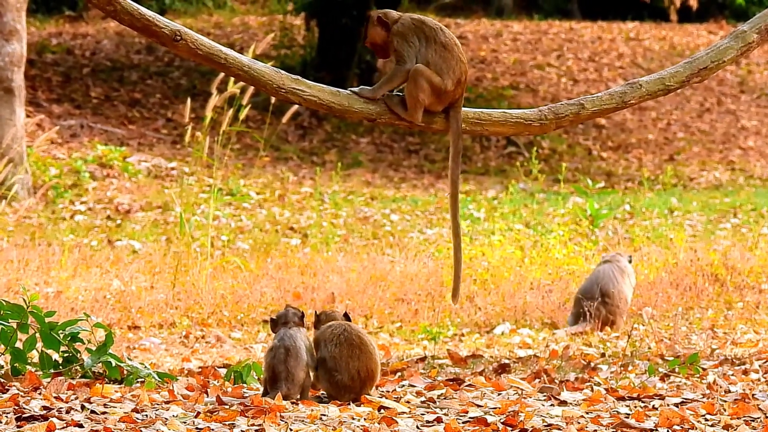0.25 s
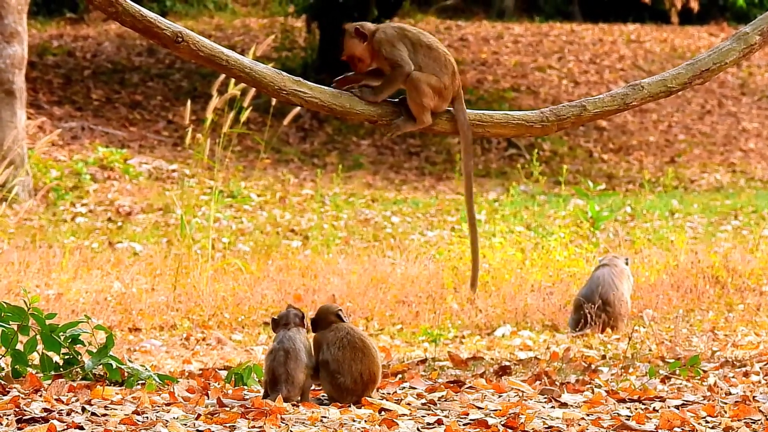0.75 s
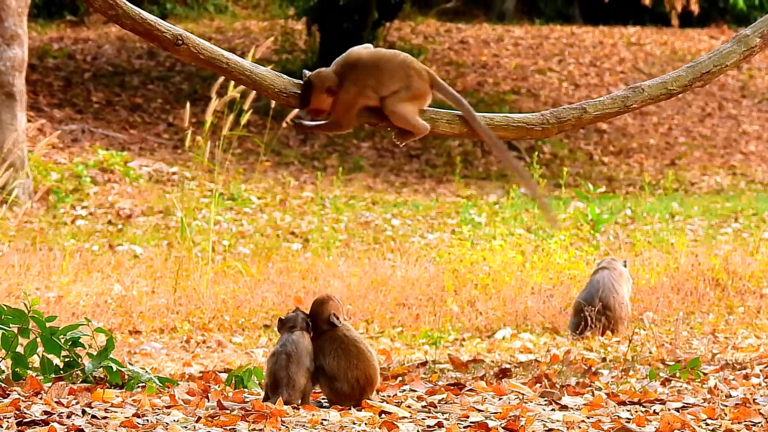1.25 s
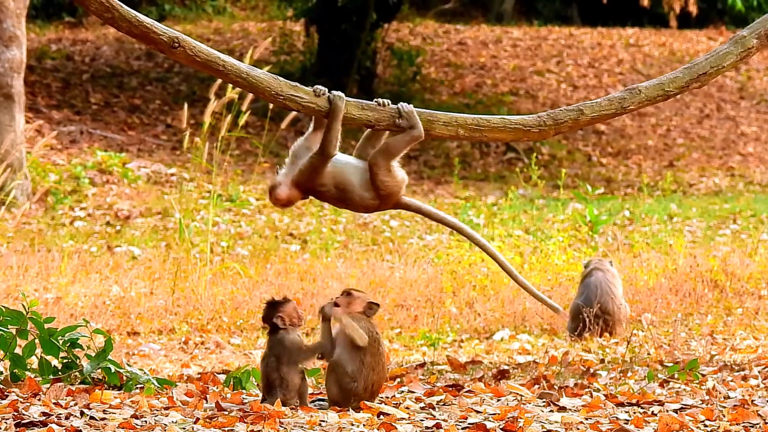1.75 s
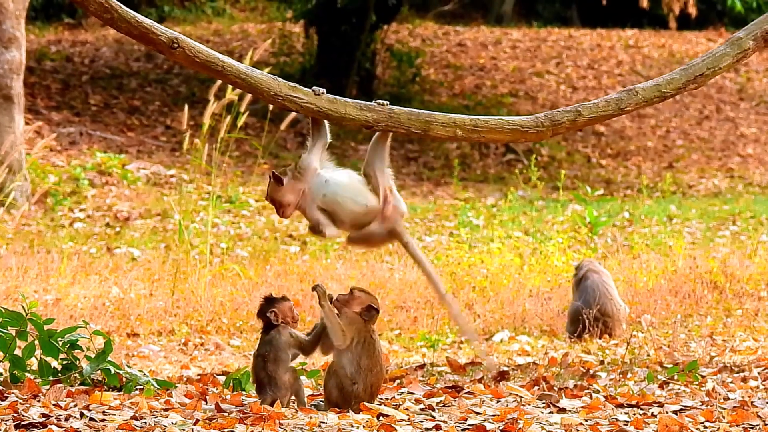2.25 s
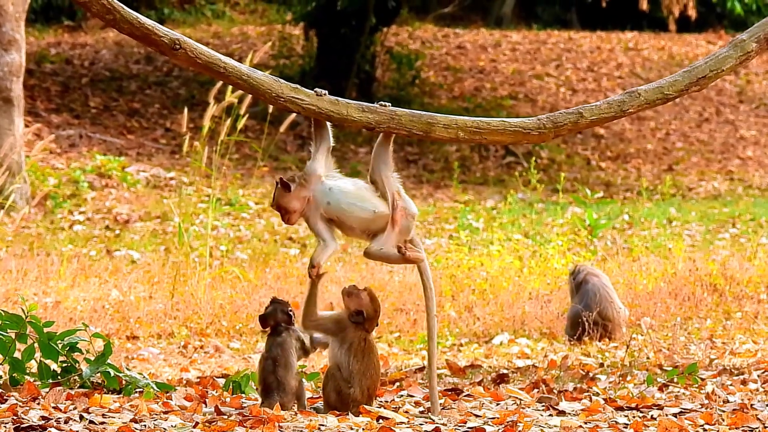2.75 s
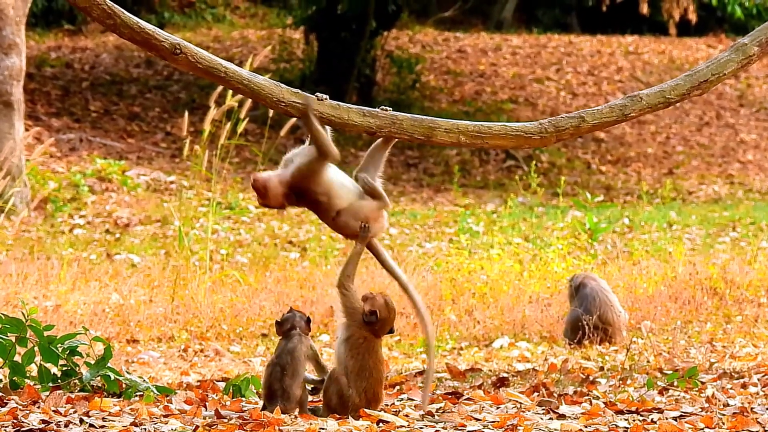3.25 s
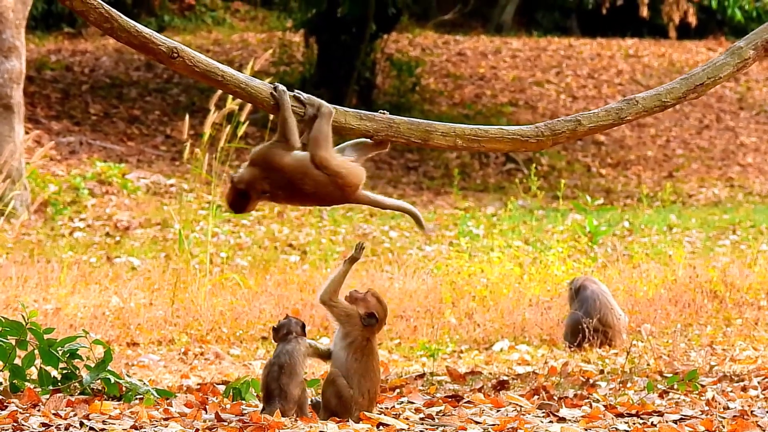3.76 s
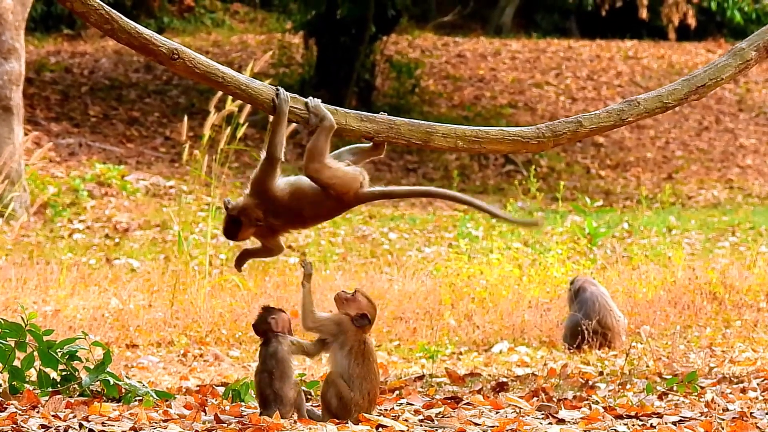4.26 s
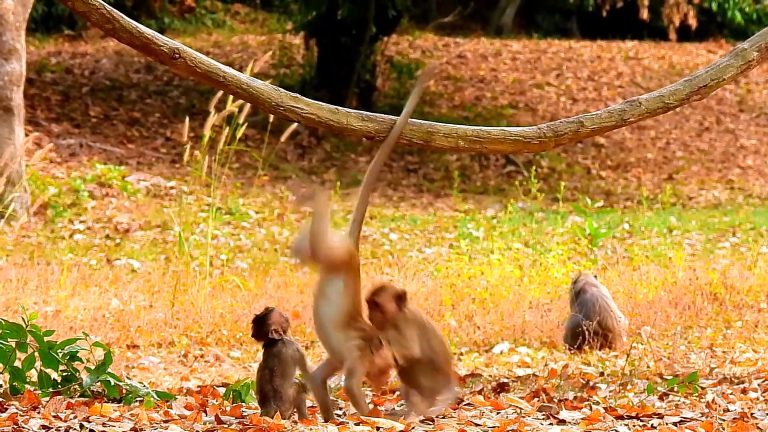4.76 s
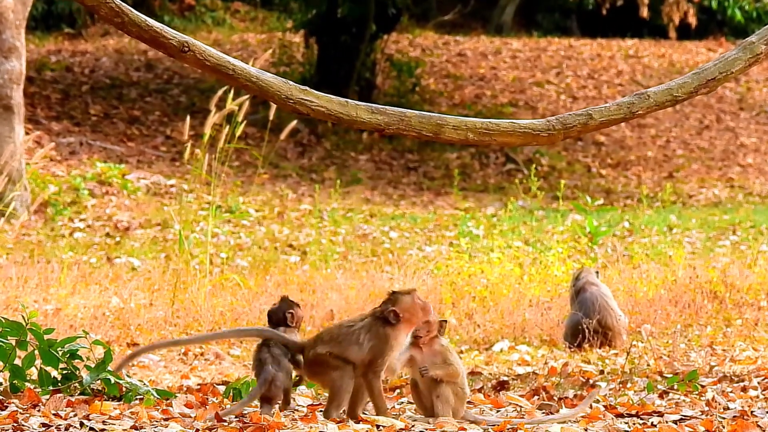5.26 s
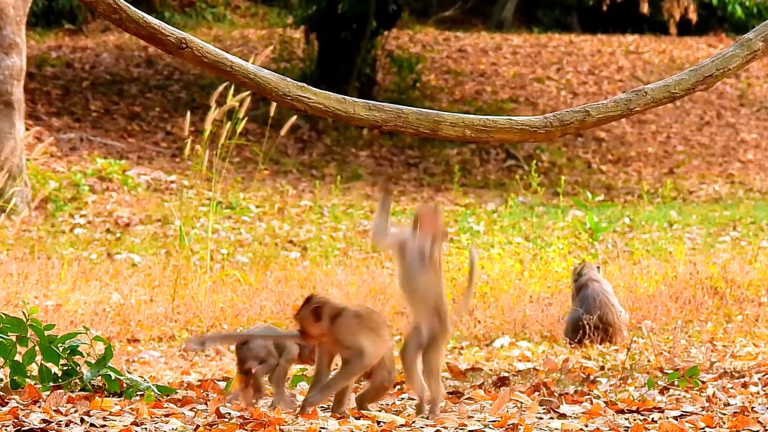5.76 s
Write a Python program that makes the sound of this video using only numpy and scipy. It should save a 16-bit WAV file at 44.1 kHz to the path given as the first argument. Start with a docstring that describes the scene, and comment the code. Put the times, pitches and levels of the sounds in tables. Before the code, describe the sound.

Young monkeys coo softly and give short falling squeals in a forest clearing, then tumble with knocks and leaf scuffling over a low steady rumble.

```python
"""A coo already under way opens over a low rumble and an even hiss; squeals and peeps follow.
Young monkeys wrestle on dry leaves in a forest clearing, scuffling and thudding when one drops from a vine.
Squeals are falling near-sinusoids and coos arched harmonic stacks, convolved with scatter from the trees.
Crunches and bright hiss bursts are filtered snaps and noise, thuds and knocks decaying tones,
the background shaped noise."""
import sys
import numpy as np
from scipy import signal
from scipy.fft import rfft, irfft
from scipy.io import wavfile

SR = 44100
rng = np.random.default_rng(int(sys.argv[2]) if len(sys.argv) > 2 else 0)


def dump(signal):
    """Clip the signal to [-1, 1] and save it as 16-bit WAV at the path in sys.argv[1]."""
    limited = np.clip(np.atleast_2d(signal).T, -1, 1)
    pcm = np.round(limited * 32767).astype(np.int16)
    wavfile.write(sys.argv[1], SR, pcm)


N = 264579
TIME = np.arange(N) / SR

# spectrum of the bright hiss bursts, also of a knock's tick: (frequency [Hz], relative spectral level [dB])
BRIGHT_SPECTRUM = [(300, -1), (1000, -2.5), (2500, 0.5), (4300, -4.5), (6000, -1.5), (7000, -2.5),
                   (7800, -9)]


def amp(db):
    """Level definition: 20 dB is a tenfold amplitude."""
    return 10 ** (np.asarray(db) / 20)


def unit(x):
    """Normalisation: scales a signal to rms 1."""
    return x / np.sqrt(np.mean(x ** 2) + 1e-20)


def read(points, hz):
    """Log-frequency interpolation of a tabulated spectrum."""
    frequency, value = np.transpose(points)
    return np.interp(np.log(hz + 1), np.log(frequency), value)  # + 1 keeps the log finite at 0 Hz


def add(mix, start, sound):
    """Superposition: adds a sound in place at a start time [s], which may lie before zero."""
    at = round(start * SR)
    sound = sound[max(-at, 0):]
    part = mix[max(at, 0):][:len(sound)]
    part += sound[:len(part)]


def colour(x, points):
    """Linear filtering: weights the spectrum of a signal, then scales it to rms 1."""
    hz = np.fft.rfftfreq(len(x), 1 / SR)
    return unit(irfft(rfft(x) * amp(read(points, hz)), len(x)))


def drift(size, rate_hz):
    """Low-pass noise: smooth random motion up to a rate, cut from 8 s of rms 1."""
    hz = np.fft.rfftfreq(SR * 8, 1 / SR)
    spectrum = rfft(rng.standard_normal(SR * 8)) / (1 + (hz / rate_hz) ** 4)
    return unit(irfft(spectrum))[:size]


def burst(peak_s, rise, decay):
    """Exponential growth to 1 at the peak time, then exponential decay."""
    return np.exp(-np.maximum((peak_s - TIME) / rise, (TIME - peak_s) / decay))


def bursts(rows):
    """Incoherent addition: the powers of overlapping bursts add."""
    power = sum((amp(db) * burst(peak_s, rise, decay)) ** 2 for peak_s, rise, decay, db in rows)
    return np.sqrt(power)


def glide(hz, db, jitter):
    """Phase is the integral of pitch: gives pitch, phase and gain of a slightly unsteady call."""
    hz = hz * (1 + jitter * drift(len(hz), 66))
    phase = 2 * np.pi * np.cumsum(hz) / SR
    return hz, phase, amp(db) * signal.windows.tukey(len(hz), .08)


def forest(x, echo_db, build=0.014, early=0.73, early_decay=0.014):
    """Multiple scattering from trunks and crowns: near trees first, then a tail damped by frequency."""
    # reverberation of the forest: (frequency [Hz], time to fall by 60 dB [s])
    echo_times = [(300, 0.53), (2100, 1.59), (3600, 1.69), (7000, 1.3)]
    taps = rng.standard_normal(2 * SR) * (rng.random(2 * SR) < 2500 / SR)  # about 2500 reflections a second
    hz, t, z = signal.stft(taps, SR, nperseg=256)
    z = z * amp(-60 * t / read(echo_times, hz)[:, None])
    z = z * (1 - np.exp(-t / build)) * (1 + early * np.exp(-t / early_decay))
    tail = signal.istft(z, SR, nperseg=256)[1]
    wet = signal.fftconvolve(x, tail)
    wet *= amp(echo_db) * np.linalg.norm(x) / np.linalg.norm(wet)  # echo energy relative to the direct sound
    return wet + np.pad(x, (0, len(wet) - len(x)))


def squeals(jitter=0.0052, flutter_db=2.5, fade_db=-11, octave_db=-41):
    """Nearly sinusoidal phonation: pitch relaxes exponentially to a lower value while the voice swells."""
    # falling squeals: (time [s], length [s], first pitch [Hz], last pitch [Hz], glide time [s],
    # level [dB], swell time [s], onset re level [dB], echo re direct sound [dB])
    squeal_table = [(.94, 0.19, 3184, 2035, 0.049, -39, 0.15, -6, 3.5),
                    (1.396, 0.19, 3108, 2068, 0.054, -49.5, 0.15, -9, 5),
                    (1.485, 0.31, 2943, 2037, 0.063, -49.5, 0.045, 4, 8.5),
                    (2.577, 0.22, 3276, 2030, 0.073, -53, 0.18, -4, 6),
                    (4.166, 0.3, 3400, 1988, 0.052, -50, 0.12, -18.5, -4.5),
                    (4.532, 0.23, 2924, 2019, 0.04, -30.5, 0.12, -19, -5.5),
                    (5.314, 0.23, 2902, 1993, .048, -51, 0.064, -11, 5),
                    (5.391, 0.18, 3168, 2060, .065, -52, 0.13, 0, 8),
                    (5.439, 0.23, 2730, 2070, .05, -39.5, 0.066, -29, 1.5),
                    (5.662, 0.25, 3064, 2118, .08, -57.5, 0.18, -4, 9.5)]
    out = np.zeros(N)
    for start, length, first_hz, last_hz, glide_s, db, swell, onset_db, echo_db in squeal_table:
        t = np.arange(0, length, 1 / SR)
        hz = last_hz + (first_hz - last_hz) * np.exp(-t / glide_s)
        hz = hz * (1 + jitter * drift(len(t), 70))
        phase = 2 * np.pi * np.cumsum(hz) / SR
        level_times = [0, swell / 2, swell, (swell + length) / 2, length]
        level = db + np.interp(t, level_times, [onset_db, -2.5, 0, -1.5, fade_db])
        gain = amp(level + flutter_db * drift(len(t), 24)) * signal.windows.tukey(len(t), .08)
        tone = unit(np.sin(phase) + amp(octave_db) * np.sin(2 * phase))
        add(out, start, forest(gain * tone, echo_db))
    return out


def coos(flutter_db=1.44):
    """Harmonic series on one pitch arch, loudest at its top, with breath hiss and uneven cycles."""
    # coos: (time [s], length [s], top pitch [Hz], scoop time [s], final sag [share of pitch], level [dB])
    coo_table = [(-.17, 0.23, 958.4, 0.026, 0.084, -56.5), (.43, .23, 944.7, .02, .17, -47),
                 (1.392, 0.21, 910, .034, 0.122, -49), (2.738, .212, 862.5, .012, 0.12, -50)]
    # voice of each coo: (echo re direct sound [dB], hiss re tone [dB], hoarseness [share of pitch],
    # then levels of harmonics 1 to 8 [dB])
    voice_table = [(2.5, -6.5, 0.0034, -8, -10, -5.5, 0, -15, -21, -19.5, -30),
                   (-1, -10, 0.0043, -17.5, -5, -8.5, 0.01, -19, -20, -14, -19.5),
                   (3.5, -4.5, 0.0136, -19, -7, -10.5, 0.011, -16, -12, -11, -21.5),
                   (0.5, -6, 0.0069, -25, -8.5, -5.5, 0, -24.5, -11, -12, -21)]
    # hiss in a coo: (frequency [Hz], relative spectral level [dB])
    hiss_spectrum = [(500, -8.5), (1500, -2.5), (3000, 7), (4300, -7.5), (6200, -1.5), (7800, -6)]
    scoop_share, sag_s, soft_db_per_octave = .14, .02, 28
    out = np.zeros(N)
    for coo, voice in zip(coo_table, voice_table):
        start, length, top_hz, scoop_s, sag, db = coo
        echo_db, hiss_db, hoarse, *harmonics_db = voice
        t = np.arange(0, length, 1 / SR)
        arch = (1 - scoop_share * np.exp(-t / scoop_s)) * (1 - sag * np.exp((t - length) / sag_s))
        level = db + soft_db_per_octave * np.log2(arch) + flutter_db * drift(len(t), 20)
        hz, phase, gain = glide(top_hz * arch, level, jitter=0.0033)
        # uneven cycles blur the upper harmonics
        phase = phase + 2 * np.pi * np.cumsum(hz * hoarse * drift(len(hz), 300)) / SR
        stack = sum(amp(h_db) * np.sin(k * phase) for k, h_db in enumerate(harmonics_db, 1))
        hiss = amp(hiss_db) * colour(rng.standard_normal(len(t)), hiss_spectrum)
        add(out, start, forest(gain * (unit(stack) + hiss), echo_db))
    return out


def squeak(flutter_db=4, echo_db=-6.0):
    """Frequency and amplitude modulation: one thin, shaky whistle that dips and rises."""
    # high squeak: (time [s], pitch [Hz], level [dB])
    squeak_table = [(4.61, 6620, -74.5), (4.69, 6250, -65.5), (4.708, 6220, -58), (4.75, 5910, -61.5),
                    (4.797, 5060, -64), (4.815, 5430, -60), (4.855, 5780, -61.5), (4.893, 7070, -58),
                    (4.918, 7300, -58)]
    out = np.zeros(N)
    times, hz, db = np.transpose(squeak_table)
    t = np.arange(times[0], times[-1], 1 / SR)
    level = np.interp(t, times, db) + flutter_db * drift(len(t), 70)
    _, phase, gain = glide(np.interp(t, times, hz), level, jitter=.011)
    add(out, times[0], forest(gain * unit(np.sin(phase)), echo_db))
    return out


def peeps(echo_db=-1.0):
    """Linear frequency sweeps: sinusoidal little calls with soft ends."""
    # faint peeps and chirps: (time [s], length [s], first pitch [Hz], last pitch [Hz], level [dB])
    peep_table = [(0.383, 0.039, 5980, 5380, -61), (0.392, .055, 2010, 2550, -56.5),
                  (2.125, 0.023, 7530, 4980, -65.5), (2.712, 0.018, 6900, 4600, -55.5),
                  (3.409, 0.077, 2145, 2080, -62.5), (3.669, .018, 2373, 2144, -49),
                  (3.84, .4, 1513, 1462, -64.5)]
    out = np.zeros(N)
    for start, length, first_hz, last_hz, db in peep_table:
        size = round(length * SR)
        _, phase, gain = glide(np.linspace(first_hz, last_hz, size), db, jitter=0.0059)
        gain = gain * signal.windows.tukey(size, .5)
        add(out, start, forest(gain * unit(np.sin(phase)), echo_db))
    return out


def thuds():
    """Heavily damped oscillation: dull blows whose pitch wanders over a band."""
    # soft thuds: (peak time [s], pitch [Hz], width [Hz], rise [s], decay [s], level [dB])
    thud_table = [(4.7, 42, 25.3, 0.039, 0.045, -52), (4.81, 45, 35.8, 0.053, 0.018, -42),
                  (5.255, 320, 290, 0.0026, 0.039, -45.5), (5.405, 94.6, 35.4, 0.009, 0.021, -34)]
    out = np.zeros(N)
    for peak_s, hz, width_hz, rise, decay, db in thud_table:
        wandering_hz = hz + width_hz / 2 * drift(N, width_hz)
        phase = 2 * np.pi * np.cumsum(wandering_hz) / SR
        out += amp(db) * burst(peak_s, rise, decay) * unit(np.sin(phase))
    return out


def knocks(tick_decay=0.0015):
    """Impact excitation: a bright noise tick on a thump that dies within a few cycles."""
    # sharp knocks: (time [s], pitch [Hz], decay [s], thump level [dB], tick level [dB])
    knock_table = [(4.556, 2750, 0.0012, -28, -46), (5.2521, 400, 0.0019, -24.5, -36.5),
                   (5.3, 540, 0.0013, -30.5, -43), (5.3224, 398, 0.0021, -31.5, -60)]
    out = np.zeros(N)
    t = np.arange(SR // 20) / SR
    for start, hz, decay, thump_db, tick_db in knock_table:
        thump = np.sin(2 * np.pi * hz * t) * np.exp(-t / decay)
        tick = colour(rng.standard_normal(len(t)), BRIGHT_SPECTRUM) * np.exp(-t / tick_decay)
        add(out, start, amp(thump_db) * thump + amp(tick_db) * tick)
    return out


def crackle(per_s, spread_db, fizz):
    """Random impulse train: tiny snaps of uneven size over a fine noise fizz."""
    size = amp(abs(spread_db) * np.minimum(rng.exponential(1, N), 4))
    snaps = size * rng.choice([-1, 1], N) * (rng.random(N) < per_s / SR)
    return unit(snaps) + fizz * rng.standard_normal(N)


def hiss_and_crunch(clump_db=1.0):
    """Shaped impulse noise: bursts of bright hiss, and a duller crunch as bodies crush the litter."""
    # bright hiss, from stirred leaves or breathed with the squeals:
    # (peak time [s], rise [s], decay [s], level [dB])
    hiss_table = [(.33, 0.11, 0.13, -60), (1.1, 0.16, 0.24, -58.5), (2.15, 0.016, 0.14, -62),
                  (2.7, 0.043, 0.17, -58), (3.25, 0.066, 0.17, -61), (3.85, 0.37, .3, -67),
                  (4.225, .02, 0.33, -57.5), (4.54, 0.07, 0.074, -51), (4.91, 0.045, 0.35, -55.5),
                  (5.17, 0.075, 0.26, -51), (5.43, 0.066, 0.25, -51.5), (5.83, .1, .3, -52)]
    # bodies scuffling in the litter: (peak time [s], rise [s], decay [s], level [dB])
    scuffle_table = [(4.559, 0.0047, 0.0068, -46.5), (4.6, 0.026, 0.011, -48.5),
                     (4.903, 0.0059, 0.019, -41.5), (4.99, 0.012, .02, -49.5), (5.151, 0.055, 0.057, -51),
                     (5.565, 0.081, 0.085, -49), (5.68, 0.053, .04, -58), (5.78, 0.12, 0.15, -43.5),
                     (5.98, 0.02, 0.1, -43)]
    # spectrum of crushed litter: (frequency [Hz], relative spectral level [dB])
    litter_spectrum = [(150, -19), (400, 3), (900, -1.5), (1800, 2.5), (2800, -1.5), (4200, -10),
                       (7000, -12.5)]
    hiss = colour(crackle(per_s=2100, spread_db=1.5, fizz=0.97), BRIGHT_SPECTRUM)
    crunch = colour(crackle(per_s=2500, spread_db=1.0, fizz=0.58), litter_spectrum)
    both = hiss * bursts(hiss_table) + crunch * bursts(scuffle_table)
    return both * amp(clump_db * drift(N, 44))


def background(air_db=-47.5, waver_db=0.27):
    """Stationary shaped noise: even outdoor hiss over a distant rumble whose level swells slowly."""
    # steady background: (frequency [Hz], relative spectral level [dB])
    air_spectrum = [(25, -19), (50, -5.5), (75, -5.5), (100, -0.5), (135, -1.5), (165, -5.5), (210, -12.5),
                    (300, -16), (500, -22.5), (1000, -22.5), (2000, -26.5), (3200, -34), (4600, -37),
                    (6000, -35), (7800, -54.5)]
    # slow swell of the rumble: (time [s], level [dB])
    rumble_swell = [(.3, 2.5), (1.6, .5), (2.75, 0.5), (3.25, -3.5), (3.75, -1), (6, 0.5)]
    air = amp(air_db) * colour(rng.standard_normal(N), air_spectrum)
    low = signal.sosfiltfilt(signal.butter(2, 400, fs=SR, output="sos"), air)
    swell_db = np.interp(TIME, *np.transpose(rumble_swell))
    return air - low + low * amp(swell_db + waver_db * drift(N, 6.9))


def scene():
    """Superposition of all sources at one microphone."""
    calls = squeals() + coos() + squeak() + peeps()
    return (calls + thuds() + knocks() + hiss_and_crunch() + background())[None]


def record(dry, mirror_hz=8000, edge_hz=10900):
    """Band limiting and spectral folding: treble rolls off under a weak mirror image about mirror_hz."""
    hz = np.fft.rfftfreq(N, 1 / SR)
    band = irfft(rfft(dry) / np.sqrt(1 + (hz / 7700) ** 200), N)
    image = 2 * band * np.cos(2 * np.pi * 2 * mirror_hz * TIME)
    # treble roll-off: (frequency [Hz], gain [dB])
    roll_db = [(6500, 0.5), (7500, -2.5), (8500, -7.5), (9500, -16), (10200, -26.5), (10900, -39.5)]
    out = irfft(rfft(band + image) * amp(read(roll_db, hz)), N)
    low_pass = signal.firwin(511, edge_hz, window=("kaiser", 9), fs=SR)
    return signal.oaconvolve(out, low_pass[None], "same")


dry = scene()
out = record(dry)
dump(out)
```